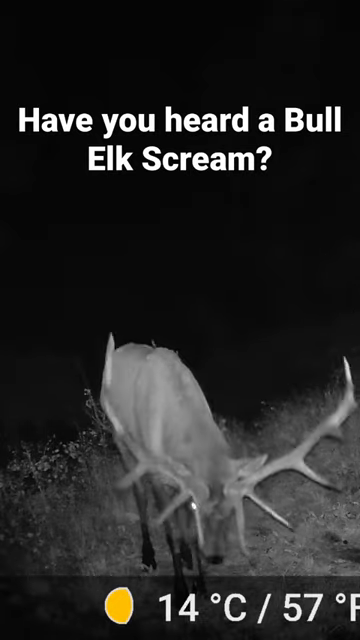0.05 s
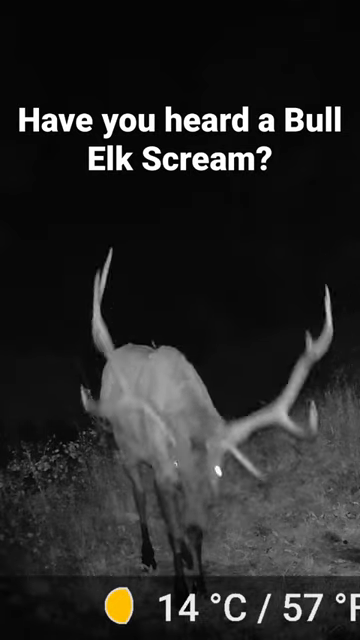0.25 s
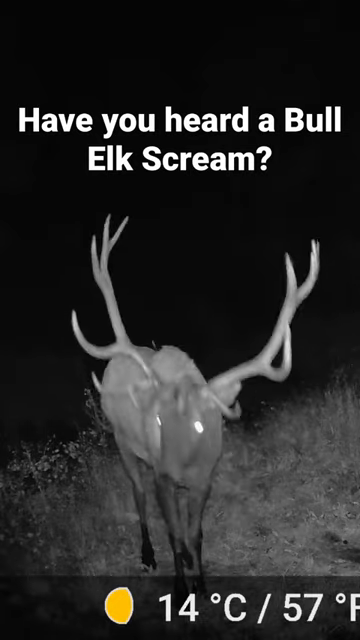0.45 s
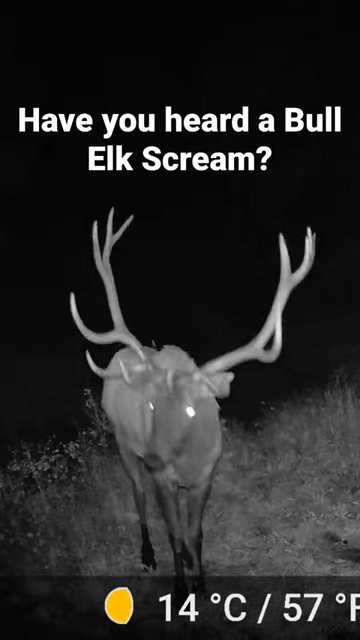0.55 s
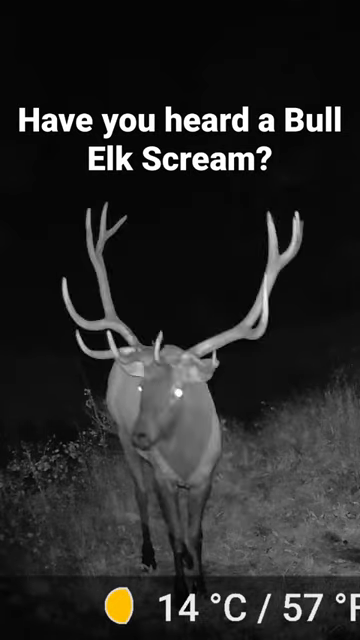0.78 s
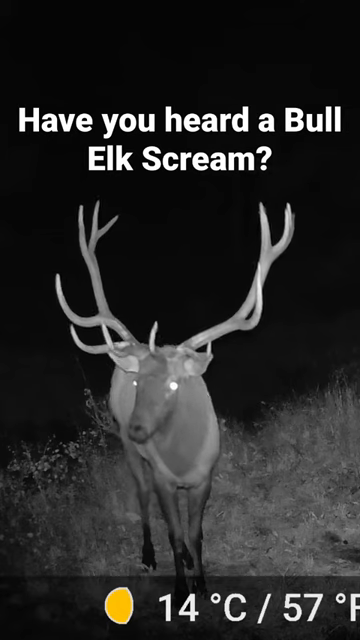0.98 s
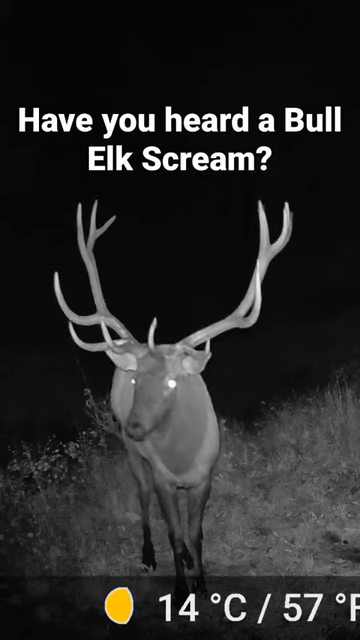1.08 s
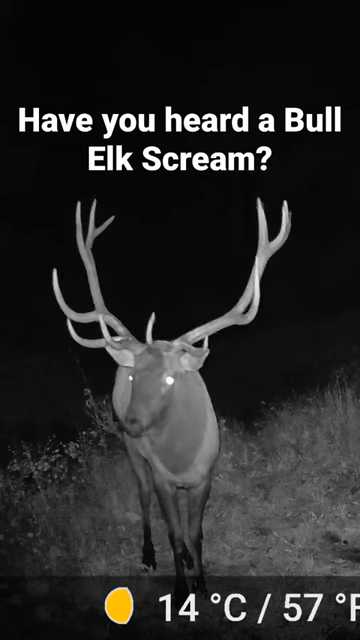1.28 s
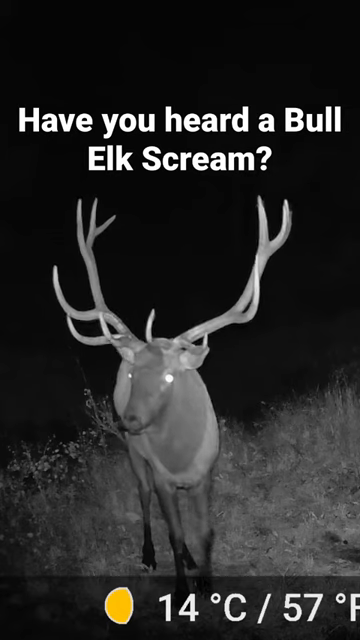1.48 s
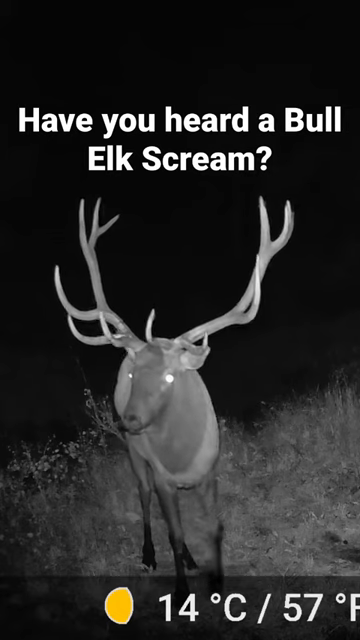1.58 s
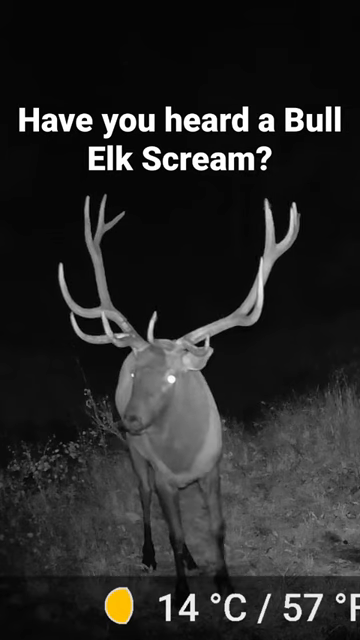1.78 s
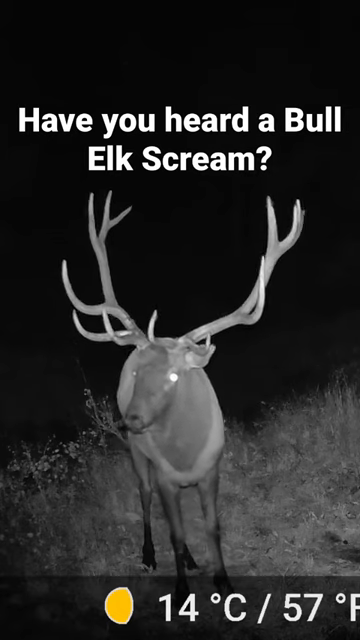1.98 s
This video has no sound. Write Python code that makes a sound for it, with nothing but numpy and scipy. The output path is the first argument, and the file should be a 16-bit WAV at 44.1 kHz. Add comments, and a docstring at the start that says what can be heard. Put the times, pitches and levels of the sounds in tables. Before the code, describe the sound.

One hard, woody knock sounds close to a small outdoor microphone as an elk lifts its head. Dull hoof thuds, soft pats and faint grass rustles follow over steady hiss, ending with a distant animal's thin squeal and yelps.

```python
"""A brush of grass, then one hard, woody knock, close to a small outdoor camera's microphone at night.
An elk lifts its head from grazing and steps up: its weight thuds dully through the ground, soft
contacts pat, grass rustles in dense tiny clicks and stems snap. At the end an animal far off gives
a thin falling squeal and short yelps. The recorder's own hiss lies under it all."""
import sys
import numpy as np
from scipy import signal
from scipy.fft import rfft, irfft
from scipy.io import wavfile
from scipy.ndimage import uniform_filter1d

SR = 44100
rng = np.random.default_rng(int(sys.argv[2]) if len(sys.argv) > 2 else 0)


def transcribe(signal):
    """Save signal, clipped to [-1, 1], as a 16-bit WAV file at the path in sys.argv[1]."""
    frames = np.atleast_2d(signal).T
    limited = np.clip(frames, -1, 1)
    pcm = np.round(limited * 32767).astype(np.int16)
    wavfile.write(sys.argv[1], SR, pcm)


N = 90404
TIME = np.arange(N) / SR

# The close knock and its rattle. Each row: start in seconds, level in dB.
KNOCK_BLOWS = [(0.2147, -34.5), (0.2167, -21), (.2218, -42), (0.2257, -37.5), (0.253, -53)]
# The struck body. Each row: frequency in Hz, relative level in dB, seconds to fade by 60 dB.
KNOCK_MODES = [(92.3, -11, 0.074), (232, -3.5, 0.05), (482, 0.5, 0.032), (750, -3.5, 0.045),
               (863, -4.5, 0.045), (1096, -2.5, 0.013), (1853, -20.5, 0.056), (2900, -0.5, 0.0076),
               (3350, -10.5, 0.013), (3680, -8.5, 0.028), (4170, -18, 0.0088), (6070, -24, 0.014),
               (6720, -29, 0.0096)]
# Hooves on the ground. Each row: peak time in seconds, level in dB, pitch in Hz, rise and fall in seconds.
HOOF_THUDS = [(.04, -45, 53, 0.018, 0.0064), (.284, -35, 88, 0.0038, 0.0042),
              (.324, -28.5, 79, 0.017, 0.026), (0.382, -47, 60, 0.013, 0.0084),
              (0.454, -48.5, 29.4, .03, 0.033), (0.465, -44.5, 101, 0.0025, 0.0054),
              (.54, -57, 55, 0.014, 0.023), (0.674, -56.5, 133, 0.0065, 0.019),
              (.962, -43, 170.6, 0.0066, 0.017), (0.975, -40, 74, 0.0069, 0.0079),
              (1.029, -50.5, 41, 0.055, 0.043), (1.166, -46.5, 162, 0.011, .016),
              (1.174, -34.5, 78, 0.013, 0.015), (1.7, -31, 157, 0.0055, 0.0074),
              (1.798, -44, 66, 0.015, .024)]
# Soft contacts, the loudest in one quick flutter.
# Each row: peak time in seconds, level in dB, pitch in Hz, half length in seconds.
SOFT_PATS = [(0.254, -42, 1090, 0.002), (0.31, -43.5, 213, 0.0022), (.511, -38, 257, 0.0019),
             (.519, -45, 174, 0.008), (0.958, -51.5, 465, 0.0053), (1.014, -53, 704, 0.0078),
             (1.155, -44, 439, 0.0054), (1.156, -52, 706, 0.0072), (1.405, -33, 485, 0.0024),
             (1.432, -41.5, 540, 0.003), (1.4859, -21.5, 200, 0.0018), (1.4966, -23, 155, 0.0023),
             (1.5075, -37.5, 520, 0.0033), (1.518, -28, 173, 0.0028), (1.53, -34, 207, 0.0021),
             (1.693, -37.5, 400, 0.0031), (1.704, -38, 380, 0.0013), (1.763, -40, 600, 0.0027),
             (1.769, -46.5, 1130, 0.0025), (1.788, -50.5, 985, 0.0068)]
# Brushes through grass, and at 0.222 s the knock's own broadband crunch. Each row: peak time, rise and fall in
# seconds, then swish, crackle, fizz in dB.
GRASS_BRUSHES = [(0.038, 0.061, 0.063, -67.5, -59, -53.5), (.196, .0007, .001, -69, -48, -50),
                 (.222, 0.004, 0.014, -39.5, -45, -52), (.257, 0.0052, 0.012, -47.5, -53.5, -61),
                 (0.299, 0.016, .02, -55, -59, -70.5), (0.476, 0.026, 0.017, -68, -55.5, -51.5),
                 (0.518, 0.021, .017, -56.5, -55, -50), (.635, .02, 0.0096, -80, -65, -65),
                 (.65, .002, .003, -75, -57, -56), (.72, .0015, .002, -75, -55, -60),
                 (.745, 0.046, 0.012, -70, -69.5, -62), (0.777, 0.0027, .003, -68, -57.5, -56.5),
                 (.97, 0.011, 0.016, -60, -68, -63.5), (1.017, .006, 0.0091, -54.5, -64, -59.5),
                 (1.156, 0.0076, 0.0026, -48.5, -57, -53.5), (1.205, 0.032, 0.023, -62, -61.5, -77),
                 (1.362, 0.013, 0.02, -57.5, -59.5, -48.5), (1.397, 0.021, 0.029, -62, -52.5, -51.5),
                 (1.505, 0.044, 0.081, -65.5, -72, -65), (1.585, 0.032, 0.077, -58.5, -57.5, -57),
                 (1.634, .001, .002, -75, -65.5, -49), (1.702, 0.016, 0.011, -47.5, -45, -55.5),
                 (1.722, 0.015, 0.039, -52, -50, -52), (1.766, 0.012, 0.027, -48.5, -46, -46),
                 (2.033, 0.045, 0.015, -57.5, -64, -57)]
# Low, middle and high parts of a rustle. Each row: frequency in Hz, relative level in dB.
SWISH_SPECTRUM = [(40, -14), (150, 9.5), (450, -4.5), (700, -1.5), (1100, -11), (1600, -21), (4000, -56)]
CRACKLE_SPECTRUM = [(800, -33.5), (2000, -15), (2600, -7), (3100, -0.5), (3800, -3.5), (4600, -12.5),
                    (7000, -22.5)]
FIZZ_SPECTRUM = [(2000, -39), (4800, -25.5), (5700, -4.5), (6400, 2.5), (7000, -5.5), (7600, -8.5)]
# Stems breaking nearby. Each row: start in seconds, level in dB, pitch in Hz, fall in seconds.
STEM_SNAPS = [(.03, -51.5, 6470, 0.0093), (0.2263, -54, 6720, 0.0049), (.513, -49.5, 3350, 0.0081),
              (1.01, -49.5, 2990, .005), (1.028, -49.5, 2480, 0.0057), (1.136, -53, 3650, 0.029),
              (1.155, -46, 3430, 0.0065), (1.359, -46.5, 3310, 0.0018), (1.36, -44.5, 6310, 0.0045),
              (1.392, -43, 2890, 0.013), (1.411, -39.5, 2650, 0.006), (1.577, -50, 3190, 0.014),
              (1.702, -38.5, 3720, 0.0038), (1.718, -44, 3290, 0.006), (1.765, -40.5, 6260, 0.0035),
              (1.778, -46, 6260, 0.0043), (1.756, -48.5, 2880, 0.012), (1.785, -47.5, 2830, 0.0088)]
# The far squeal's course. Each row: time in seconds, pitch in Hz, fundamental and octave levels in dB.
SQUEAL_CONTOUR = [(1.823, 1308, -62.5, -81), (1.851, 1260, -66, -63), (1.859, 1240, -46, -69),
                  (1.875, 1197, -45, -58.5), (1.888, 1152, -52.5, -60.5), (1.912, 1149, -54, -53.5),
                  (1.936, 1103, -52.5, -55), (1.952, 1043, -67, -54.5), (1.967, 1010, -70, -69)]
# Yelps after it. Each row: start and length in seconds, level in dB, first and last pitch in Hz.
YELPS = [(1.964, 0.029, -44.5, 1716, 1410), (1.982, .02, -48.5, 1480, 1360), (1.989, .025, -57, 1695, 1514),
         (2.012, 0.06, -53.5, 1690, 1337)]
# Noise in a yelp. Each row: frequency in Hz, relative level in dB.
RASP_SPECTRUM = [(900, -33), (1350, 4.5), (1600, 0), (2100, 0), (2500, -13), (4000, -35)]
# The recorder's noise floor. Each row: frequency in Hz, relative level in dB.
HISS_SPECTRUM = [(15, -3), (40, -1), (90, 2.5), (160, 0), (260, -3), (500, -6), (1000, -10.5),
                 (1480, -12.5), (1750, -4.5), (2020, -3), (2300, -15), (3200, -11), (4100, -14),
                 (5000, -15.5), (6500, -13), (7100, -19.5)]


def amp(db):
    """Decibels to gain."""
    return 10 ** (np.asarray(db) / 20)


def unit(x):
    """Scales to rms 1."""
    return x / np.sqrt(np.mean(x ** 2) + 1e-20)


def colour(x, spectrum):
    """Shapes x with a spectrum, at rms 1."""
    hz, db = np.transpose(spectrum)
    bin_db = np.interp(np.log(np.fft.rfftfreq(N, 1 / SR) + 1), np.log(hz), db)
    return unit(irfft(rfft(x) * amp(bin_db), N))


def swell(at, rise, fall):
    """A rounded bump with its own rise and fall."""
    return np.exp(-((TIME - at) / np.where(TIME < at, rise, fall)) ** 2)


def wander(samples):
    """Noise smoothed over so many samples, at rms 1."""
    return unit(uniform_filter1d(rng.standard_normal(N), size=samples))


def with_scatter(direct, level_db, t60_s):
    """The direct sound plus diffuse reflections from ground and brush."""
    tail = rng.standard_normal(N) * amp(-60 * TIME / t60_s)
    return direct + amp(level_db) * signal.fftconvolve(direct, tail / np.linalg.norm(tail))[:N]


def knock(rise_s=0.00063):
    """Close up, quick blows ring one damped, woody body; neighbouring modes swing opposite ways."""
    ring = sum((-1) ** k * amp(db - 60 * TIME / t60) * np.sin(2 * np.pi * hz * TIME)
               for k, (hz, db, t60) in enumerate(KNOCK_MODES))
    ring *= 1 - np.exp(-TIME / rise_s)
    blows = np.zeros(N)
    for at, db in KNOCK_BLOWS:
        blows[round(at * SR)] += amp(db)
    return with_scatter(signal.fftconvolve(blows, ring)[:N], level_db=-8, t60_s=0.098)


def hoof_thuds():
    """The elk's shifting weight sets off a few slow, low swings in the ground."""
    return sum(amp(db) * swell(at, rise, fall) * np.sin(2 * np.pi * hz * (TIME - at))
               for at, db, hz, rise, fall in HOOF_THUDS)


def soft_pats(lag_cycles=0.12, low_cut_hz=60):
    """Soft contacts near the microphone: each is a brief push of air with a short tail."""
    pushes = sum(amp(db) * swell(at, half, half) * np.cos(2 * np.pi * (hz * (TIME - at) - lag_cycles))
                 for at, db, hz, half in SOFT_PATS)
    # A gentle high-pass keeps them out of the deep bass.
    low_cut = signal.butter(2, low_cut_hz, "high", fs=SR, output="sos")
    return with_scatter(signal.sosfilt(low_cut, pushes), level_db=-10, t60_s=0.17)


def grass_rustle(clicks_per_s=4500, spread_db=2.5):
    """Dense tiny clicks of uneven size swell with each brush through the grass and with the knock's crunch, in
    three colours."""
    rustle = np.zeros(N)
    for k, spectrum in enumerate([SWISH_SPECTRUM, CRACKLE_SPECTRUM, FIZZ_SPECTRUM]):
        clicks = rng.choice([-1., 1.], N) * (rng.random(N) < clicks_per_s / SR)
        sizes = amp(spread_db * np.minimum(rng.exponential(1, N), 4))
        power = sum((amp(dbs[k]) * swell(at, rise, fall)) ** 2 for at, rise, fall, *dbs in GRASS_BRUSHES)
        rustle += np.sqrt(power) * colour(clicks * sizes, spectrum)
    return rustle


def stem_snaps(width_hz=300, rise_s=0.0008):
    """Each stem gives way in a short, slightly uneven burst in one resonance."""
    snaps = np.zeros(N)
    for at, db, hz, fall in STEM_SNAPS:
        band = signal.butter(2, [hz - width_hz / 2, hz + width_hz / 2], "band", fs=SR, output="sos")
        ring = signal.sosfilt(band, rng.standard_normal(N))
        power = uniform_filter1d(uniform_filter1d(ring ** 2, size=160), size=100)
        steady_ring = unit(ring / np.sqrt(abs(power) + 1e-9))
        snaps += amp(db) * swell(at + rise_s, rise_s, fall) * steady_ring
    return snaps


def distant_call(pitch_jitter=0.00808, shimmer_db=1.0):
    """Far off, a thin squeal sinks in pitch, then breaks upward into short falling yelps."""
    at, hz, db, octave_db = np.transpose(SQUEAL_CONTOUR)
    waver = 1 + pitch_jitter * wander(samples=150)
    phase = 2 * np.pi * np.cumsum(np.interp(TIME, at, hz) * waver) / SR
    fundamental = amp(np.interp(TIME, at, db)) * np.sin(phase)
    octave = amp(np.interp(TIME, at, octave_db)) * np.sin(2 * phase)
    voice = (fundamental + octave) * (TIME > at[0]) * (TIME < at[-1])
    for start, length, level_db, first_hz, last_hz in YELPS:
        progress = np.clip((TIME - start) / length, 0, 1)
        phase = 2 * np.pi * np.cumsum((first_hz + (last_hz - first_hz) * progress) * waver) / SR
        rasp = 0.26 * colour(rng.standard_normal(N), RASP_SPECTRUM)
        envelope = np.interp(progress, [0, 0.35, 1], [0, 1, 0])
        voice += amp(level_db) * envelope * (np.sin(phase) + rasp)
    voice *= amp(shimmer_db * wander(samples=260))
    return np.sqrt(2) * with_scatter(voice, level_db=-8, t60_s=0.35)  # makes the tones' levels rms


def recorder_hiss(level_db=-57.5):
    """Steady self-noise with a hump near 2 kHz."""
    return amp(level_db) * colour(rng.standard_normal(N), HISS_SPECTRUM)


def scene():
    """One microphone in the grass: the elk close by, the caller far off, hiss underneath."""
    close_by = knock() + hoof_thuds() + soft_pats() + grass_rustle() + stem_snaps()
    return (close_by + distant_call() + recorder_hiss())[None]


def record(dry):
    """The small camera cuts off the treble above 7400 Hz."""
    low_pass = signal.firwin(301, 7400, window=("kaiser", 8), fs=SR)
    return signal.oaconvolve(dry, low_pass[None], "same")


dry = scene()
out = record(dry)
transcribe(out)
```